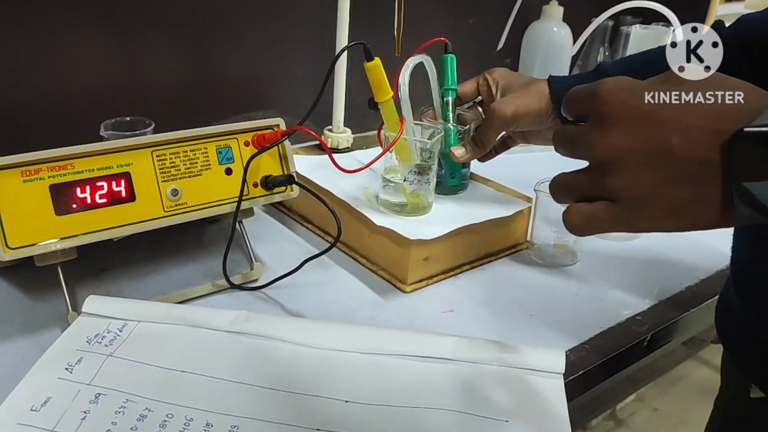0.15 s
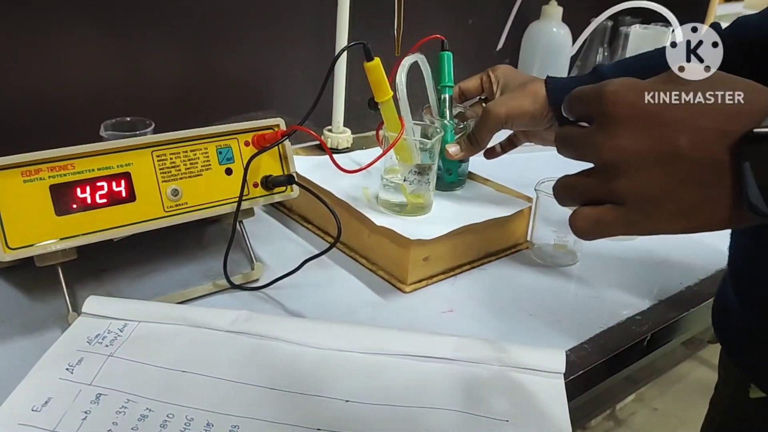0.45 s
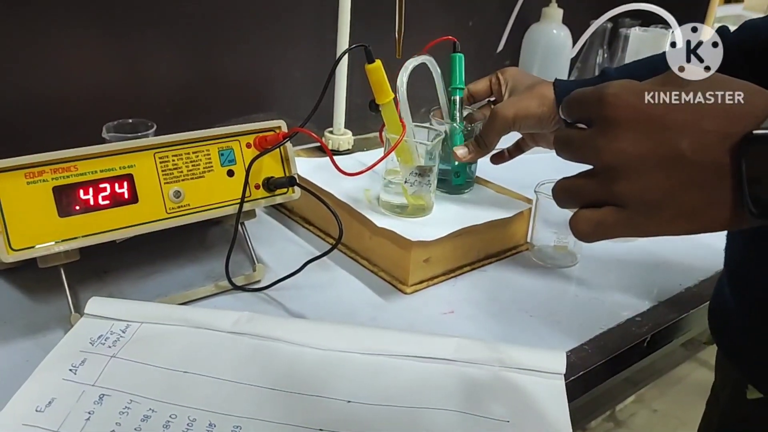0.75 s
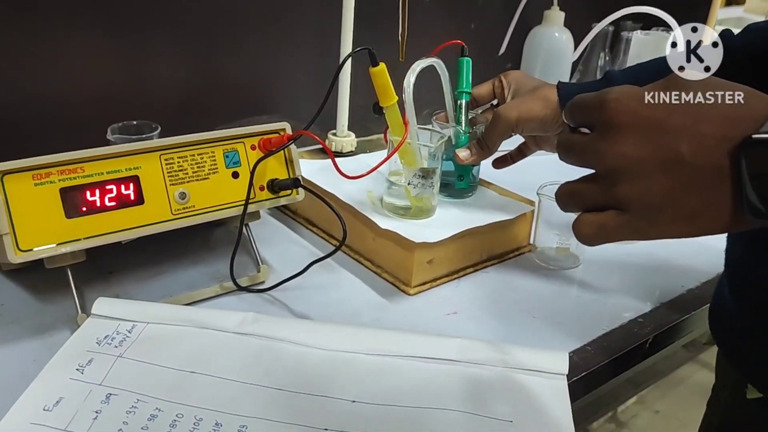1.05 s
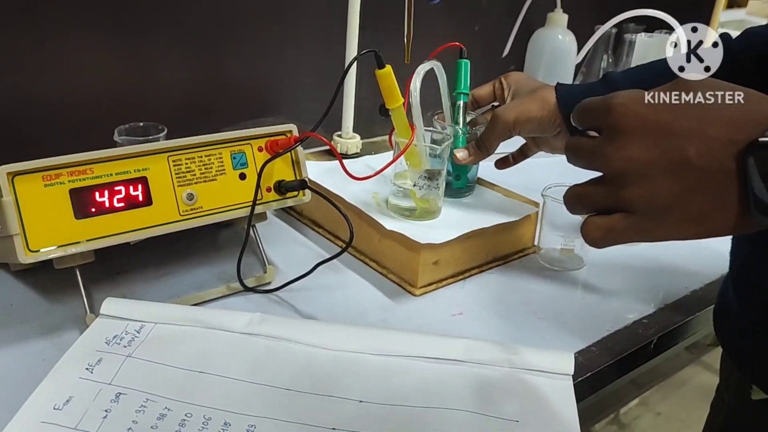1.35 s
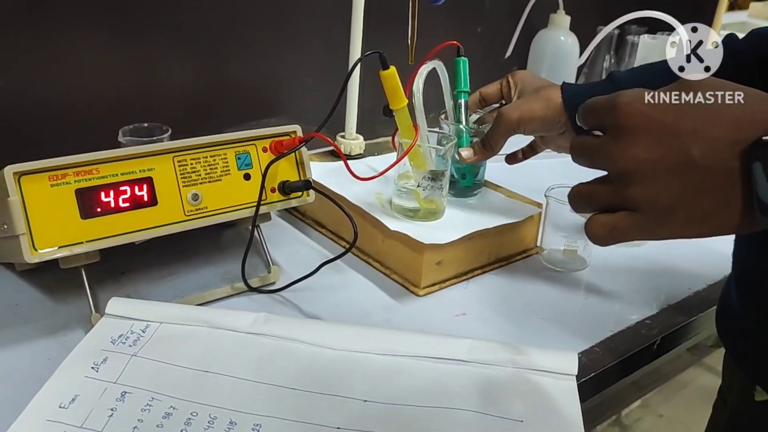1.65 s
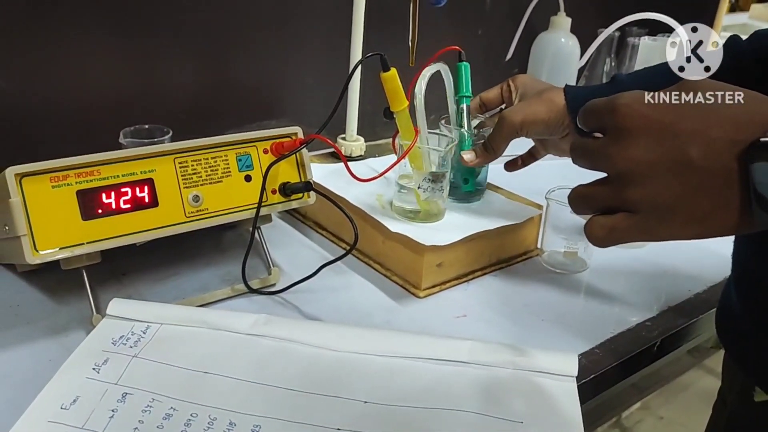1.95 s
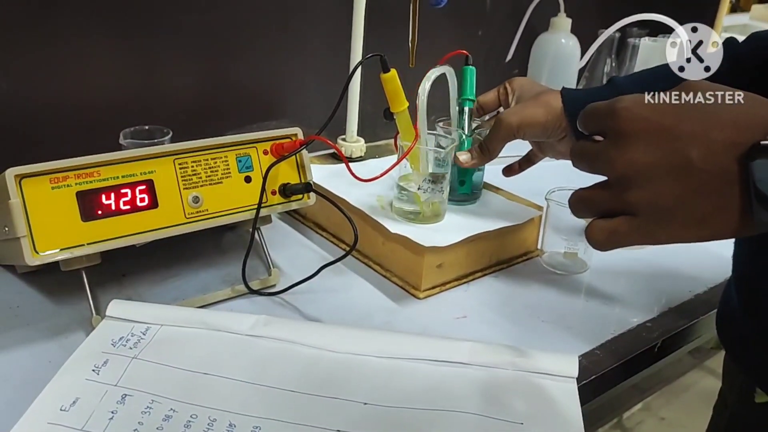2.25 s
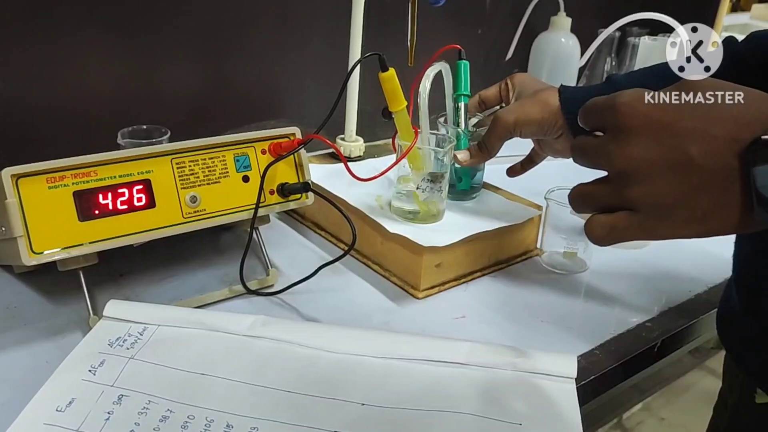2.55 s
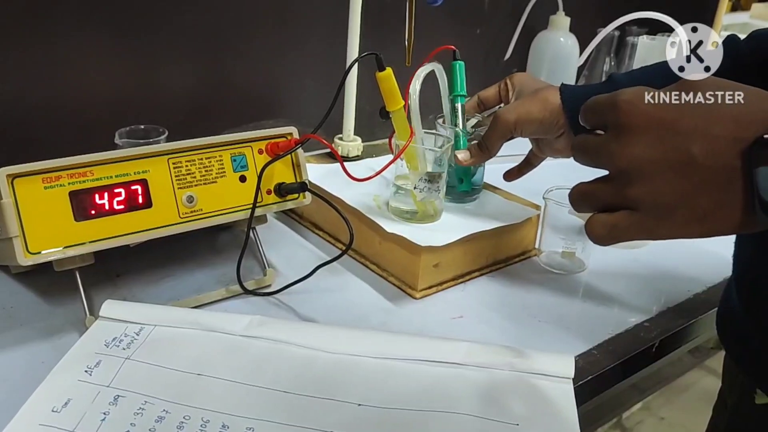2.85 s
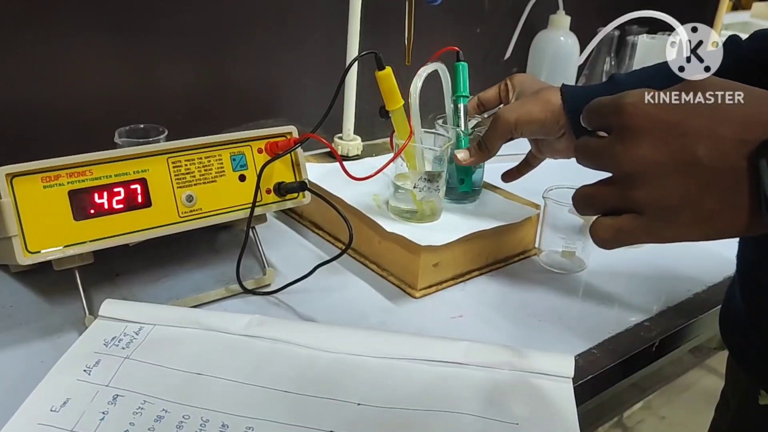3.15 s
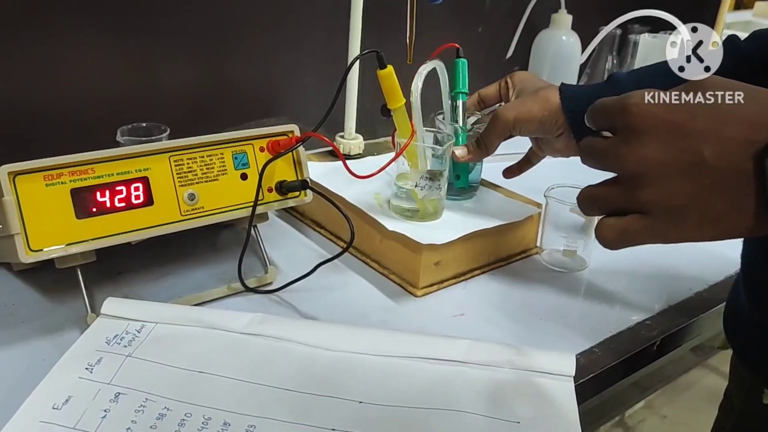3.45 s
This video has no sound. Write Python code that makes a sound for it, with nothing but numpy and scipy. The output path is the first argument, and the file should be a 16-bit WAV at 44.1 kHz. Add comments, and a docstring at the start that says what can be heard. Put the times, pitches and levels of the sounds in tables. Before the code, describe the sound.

A glass beaker swirled by hand, with rapid light clinks and dull knocks on wood.

```python
"""A glass beaker is swirled by hand on a wooden block in a small hard room, over faint room noise.
From the start, about four times a second, its foot knocks dully on the block, a glass tube clinks on
one side and an electrode (a probe in the beaker) rattles against the other. Around two seconds in,
the rim rings softly, mostly as the foot knocks. Then the electrode twice strikes the rim squarely, so
the whole beaker rings. The clinks, taps and knocks go on to the end."""
import sys
import numpy as np
from scipy import signal
from scipy.fft import rfft, irfft
from scipy.io import wavfile

SR = 44100
rng = np.random.default_rng(int(sys.argv[2]) if len(sys.argv) > 2 else 0)


def waveform_to_disk(signal):
    """Save audio, clipped to [-1, 1], as 16-bit WAV at the path in sys.argv[1]."""
    frames = np.transpose(np.atleast_2d(signal))
    scaled = np.clip(frames, -1, 1) * 32767
    samples = np.round(scaled).astype(np.int16)
    wavfile.write(sys.argv[1], SR, samples)


N = 158760

# Levels in the tables are relative. A mode is one tone of a struck object; its fade is the time it
# takes to drop 60 dB. Pan is left minus right. A crack is the short hiss of a contact.
# room noise (frequency [Hz], level [dB])
AIR_SPECTRUM = [(25, 5), (50, 0.5), (80, 6.5), (135, 10.5), (200, 9), (290, 8), (430, 6), (650, -4),
                (1050, -10), (1800, -6.5), (2800, -9.5), (5000, -13.5), (8500, -9), (10500, -22),
                (14000, -26.5)]
# how long the room rings (frequency [Hz], fade [s])
ROOM_FADES = [(200, 1), (1500, 0.67), (5000, 0.72), (9000, 0.57), (15000, 0.35)]
# how much of the left-right difference is kept (frequency [Hz], gain [dB])
STEREO_WIDTH = [(25, -5), (60, -2), (130, -13.5), (300, -13), (480, -6.5), (750, -2), (1500, 0)]
# knocks of the foot (time [s], thud [dB], clack [dB], glass tick [dB])
FOOT_KNOCKS = [(.004, -39, -64, -55), (.133, -35.5, -41.5, -30.5), (0.259, -38, -40, -22),
               (0.342, -37.5, -44, -37.5), (.582, -32, -39, -27.5), (0.823, -55, -44, -29),
               (.831, -34.5, -40, -44), (1.046, -38, -40.5, -35.5), (1.262, -34.5, -39, -29.5),
               (1.461, -36.5, -41, -34), (1.704, -32.5, -37, -29.5), (1.856, -36.5, -39.5, -27.5),
               (1.942, -30.5, -36, -34), (1.956, -42, -47, -29), (2.084, -35.5, -50, -26),
               (2.113, -42, -42, -30), (2.166, -34, -38, -29.5), (2.364, -44.5, -42, -46),
               (2.738, -44, -45, -32), (2.804, -38, -40.5, -27.5), (2.967, -45, -42.5, -38),
               (3.041, -38, -38.5, -28.5), (3.21, -42, -39.5, -26), (3.469, -40.5, -48, -33.5)]
# hollow tocks as the foot settles (time [s], level [dB], glass tick [dB])
FOOT_TOCKS = [(0.168, -48.5, -44), (0.602, -46.5, -51), (0.64, -47.5, -52), (0.849, -52, -63),
              (1.065, -49.5, -46), (1.894, -47.5, -53), (1.993, -40, -37.5), (3.212, -46.5, -38)]
# deeper bumps of the block on the bench (time [s], level [dB])
BENCH_BUMPS = [(.282, -34), (1.866, -41.5), (1.956, -36.5), (2.169, -44)]
# the rim rings softly, mostly as the foot knocks on the block (time [s], level [dB], pitch [Hz])
RIM_RINGS = [(1.676, -23, 5930), (1.704, -20, 6040), (1.941, -18.5, 5960), (2.09, -15, 5880)]
# tube clinks (time [s], level [dB], pitch [Hz], rim ring [dB], crack [dB])
TUBE_CLINKS = [(0.029, -29.5, 5040, 2, 6.5), (0.387, -19, 4680, -20, -4.5), (0.632, -21.5, 4900, -30, -0.5),
               (0.856, -18.5, 4920, -10, -10), (1.137, -29.5, 5000, -25, 3), (1.377, -19, 4970, -16, -24),
               (1.614, -16.5, 4900, -20, -6.5), (1.8409, -10.5, 4836, -10, -7),
               (2.063, -12.5, 4800, -16, -3), (2.293, -14, 4770, -20, -1), (2.3219, -18, 5100, -8, -2.5),
               (2.7326, -14, 4930, -2, -4.5), (2.963, -13, 4900, 1, -5), (3.194, -17, 4905, 4, 1),
               (3.4107, -17.5, 4915, 6.5, 3)]
# electrode taps (time [s], level [dB], pitch [Hz], stretch of the other modes [ratio], rim ring [dB],
# crack [dB], boost of the highest modes [dB])
ELECTRODE_TAPS = [(0.243, -16, 4780, 0.99, -10, -8, 3.5), (0.2591, -21, 4560, 1.02, -4, 7, 1.5),
                  (0.4735, -20.5, 4950, 0.97, -7, 0, -1), (0.7102, -15, 5170, 0.99, -9, -3, -0.5),
                  (.928, -23.5, 4960, 0.95, -0.5, 2, -2.5), (1.192, -15, 5110, 1.02, -8, 3.5, 1),
                  (1.398, -18.5, 5160, 0.97, -3, -1, 3), (1.654, -14, 5000, 0.99, -2, 2, 0),
                  (1.886, -13, 5140, 1.03, -3.5, 3, 1.5), (2.081, -18, 4650, 1.08, 8, 5.5, 1),
                  (2.109, -11.5, 4680, .995, 0, -2, -4), (2.790, -17, 5100, 1, 2, -3, -6),
                  (3.029, -15, 5110, 0.98, 0, -5.5, -3.5), (3.241, -21.5, 4560, 1, 5, 1.5, -3),
                  (3.463, -28, 5090, 1.01, 5.5, 6, -5), (3.475, -28.5, 4900, 1.06, 5, 8, -2)]
# square strikes on the rim (time [s], level [dB], wall mode [Hz], wall mode [dB], low mode [dB])
RIM_STRIKES = [(2.3305, -14, 4700, -1.5, -17), (2.5676, -20, 4850, -6, -9)]
# modes of the foot, block and bench (frequency [Hz], level [dB], fade [s], pan [dB])
THUD_MODES = [(196, -9.5, 0.052, 0.029), (288.3, -3.5, 0.11, 0.82), (334.3, -0.5, 0.056, -2.4),
              (427.3, -6, 0.082, -1)]
CLACK_MODES = [(880, -5.5, 0.014, -2), (1345, -1, 0.04, 10.5), (1607, 0, 0.025, 7), (1946, -2, 0.053, 0),
               (2425, -3, 0.014, 2)]
TICK_MODES = [(4155, 1, 0.011, -9), (4680, 0, 0.0073, -9), (6900, -5, 0.007, -15), (8690, -1.5, 0.026, -2),
              (11900, -12, 0.0078, -3), (14330, -9, 0.0092, -9)]
TOCK_MODES = [(1863, 1.5, 0.021, 2), (1957, 4.5, 0.047, -1.5)]
TOCK_TICK_MODES = [(5000, 1, 0.0091, -18)]
BENCH_MODES = [(137.4, -2, 0.083, -5.5), (199, -3, 0.18, -20.5), (275, -0.5, 0.12, 1)]
# modes of the glass (frequency [Hz], level [dB], fade [s], pan [dB])
TUBE_MODES = [(1828, -17, 0.063, 0.5), (4090, -22, 0.024, -3), (4860, 1, 0.018, -15),
              (8270, -5, 0.047, -6.5), (9110, -7, 0.043, -3), (10900, -15, 0.0063, -12),
              (13900, -15, .006, -14), (15700, -22, 0.018, 15)]
BEAKER_WALL_MODES = [(3843, -12.5, 0.053, -4), (4810, -10, 0.047, -13), (4970, -3, 0.011, -9.5),
                     (7080, -16.5, 0.035, 2), (8170, -12, 0.025, -21), (8708, -2.5, 0.025, -5.5),
                     (8330, -19.5, 0.0084, 23), (11275, -9.5, 0.017, -4.5), (13870, -14, 0.022, -20),
                     (13370, -13.5, 0.036, -8)]
RIM_MODES = [(5906, -18.5, 0.27, -16), (5964, -13.5, 0.14, -11), (9870, -32, 0.05, -5)]
WHOLE_BEAKER_MODES = [(5930, -4, .07, -12), (5942, -17, .16, -4), (6380, -16, .025, -5),
                      (6850, -15, .025, -3), (7270, -14, .025, -3), (8550, -7, .016, -3),
                      (9120, -12, .018, -3), (9960, -14, .05, -5), (11200, -13, .008, -6),
                      (13500, -10, .013, -11), (15200, -22, .03, -5)]
# cracks of glass on wood, of the tube and of the electrode (frequency [Hz], level [dB])
FOOT_CRACK_SPECTRUM = [(200, -28), (780, -11), (1050, -9), (1400, -5), (2500, -0.5), (4200, -3.5),
                       (6000, -0.5), (9000, -4.5), (10500, -50), (15000, -18)]
TUBE_CRACK_SPECTRUM = [(200, -15), (900, -3.5), (1500, -7), (2600, -10), (4000, 5), (6500, -3), (9500, 3.5),
                       (10500, -8), (14000, 4), (15500, -12)]
GLASS_CRACK_SPECTRUM = [(200, -23), (900, -30), (1500, 1.5), (2800, -13), (3700, -2), (6500, -3.5),
                        (9000, 9.5), (10400, -49), (12500, -15.5), (15000, -23)]

RING_TIME = np.arange(SR // 3) / SR  # seconds since a contact
AIR_DB, THUD_DB, CLACK_DB, TICK_DB, TUBE_DB, TAP_DB = -49.5, -1, -3.5, -8, -8.5, -6
BOUNCE_S, BOUNCE_WIDTH_S, BOUNCE_GAIN = 0.0035, 0.00042, 0.85
FIRST_TOUCH, SCATTER, RIGHT_LAG_S = 3.57, 0.53, 0.000185
WAVER_DEPTH, WAVER_HZ, RISE_CYCLES = 0.0023, 28.3, 0.83  # depth is a share of the pitch
ECHO_START_S, ECHO_DECAY_S = 0.0066, 0.012
WALL_ECHO_S, WALL_ECHO_WIDTH_S, WALL_ECHO_GAIN = 0.01356, 0.00095, 0.74
FOOT_CHATTER_S, THUD_LAG_S = 0.002, 0.002865
RATTLE_GAP_S, RATTLE_DB, RATTLE_FALL_DB_PER_S = 0.015, -9, 211
SPARKLE_ABOVE_HZ, TOP_HZ = 10500, 15500


def gain(db):
    """Turn decibels into a number to multiply by."""
    return 10 ** (np.asarray(db) / 20)


def normalise(x):
    """Scale each channel to the energy of a five-millisecond burst at full level."""
    return x / np.sqrt(np.sum(x ** 2, axis=-1, keepdims=True) / (.005 * SR))


def pan(db):
    """Share a sound between left and right, keeping its total power."""
    sides = gain(np.array([[db], [-db]]) / 2)
    return sides / np.sqrt(np.mean(sides ** 2))


def colour(x, spectrum):
    """Turn each frequency up or down along a curve of (frequency [Hz], level [dB]) points."""
    n = x.shape[-1]
    hz, db = np.array(spectrum).T
    curve_db = np.interp(np.log(np.fft.rfftfreq(n, 1 / SR) + 1), np.log(hz), db)
    return irfft(rfft(x) * gain(curve_db), n)


def add(out, time, x):
    """Mix a sound in at a time in seconds."""
    start = max(int(time * SR), 0)
    out[:, start:start + x.shape[1]] += x[:, :N - start]


def contact(chatter_s):
    """The push of a hit: a first touch, then brief chatter with a bounce, a bit different each side."""
    t = RING_TIME[:SR // 50]
    noise = rng.standard_normal((3, len(t)))
    chatter = np.exp(-(t / chatter_s) ** 4)
    bounce = BOUNCE_GAIN * np.exp(-((t - BOUNCE_S) / BOUNCE_WIDTH_S) ** 2)
    push = (noise[0] + SCATTER * noise[1:]) * (chatter + bounce)
    push[:, 0] += FIRST_TOUCH
    return push


def ring(modes, pitch=1, chatter_s=0.005):
    """One hit sets the modes ringing, wavering a little; the sound reaches the right side later."""
    push, out = contact(chatter_s), 0
    t = np.maximum(RING_TIME - np.array([[0], [RIGHT_LAG_S]]), 0)
    waver = WAVER_DEPTH / (2 * np.pi * WAVER_HZ) * np.sin(2 * np.pi * (WAVER_HZ * t + rng.random()))
    for hz, db, fade_s, pan_db in modes:
        envelope = (1 - np.exp(-t * hz / RISE_CYCLES)) * np.exp(-np.log(1000) * t / fade_s)
        tone = np.sin(2 * np.pi * hz * pitch * (t + waver)) * envelope
        struck = signal.fftconvolve(tone, push, axes=1)[:, :len(RING_TIME)]
        out = out + normalise(struck) * pan(pan_db) * gain(db)
    return out


def retune(modes, hz, stretch=1):
    """The point of contact moves the mode nearest to hz onto it; the others stretch together."""
    nearest = min(modes, key=lambda mode: abs(mode[0] - hz))
    return [(hz if mode is nearest else mode[0] * stretch, *mode[1:]) for mode in modes]


def crack(spectrum, decay_s, pan_db):
    """A contact makes a burst of noise that dies quickly."""
    noise = colour(rng.standard_normal((2, len(RING_TIME))), spectrum)
    return normalise(noise * np.exp(-RING_TIME / decay_s)) * pan(pan_db)


def air():
    """Faint, steady room noise, mostly low in pitch."""
    noise = colour(rng.standard_normal((2, N)), AIR_SPECTRUM)
    return noise * gain(AIR_DB) / np.std(noise)


def room(x, tail_db):
    """The room adds a smooth tail of echoes whose highest tones die first."""
    t = np.arange(SR) / SR
    noise, hz = rfft(rng.standard_normal((2, SR))), np.fft.rfftfreq(SR, 1 / SR)
    centres, tail = np.array(ROOM_FADES)[:, 0], 0
    for share, (_, fade_s) in zip(np.eye(len(centres)), ROOM_FADES):
        band = irfft(noise * np.interp(hz, centres, share), SR)
        tail = tail + band * (t > WALL_ECHO_S) * np.exp(-np.log(1000) * t / fade_s)
    tail /= np.sqrt(np.sum(tail ** 2) / 2)
    return x + gain(tail_db) * signal.fftconvolve(x, tail, axes=1)[:, :N]


def echoes(x, db):
    """Quick echoes off the bench and a wall, new for each hit because the beaker moves."""
    t = RING_TIME[:SR // 12]
    bench = (t > ECHO_START_S) * np.exp(-(t - ECHO_START_S) / ECHO_DECAY_S)
    wall = WALL_ECHO_GAIN * np.exp(-((t - WALL_ECHO_S) / WALL_ECHO_WIDTH_S) ** 2)
    envelope = bench + wall
    pattern = rng.standard_normal((2, len(t))) * envelope / np.sqrt(np.sum(envelope ** 2))
    return x + gain(db) * signal.fftconvolve(x, pattern, axes=1)[:, :x.shape[1]]


def beaker_foot():
    """The rocking foot clacks, ticks and thuds, and settles with a tock; the block bumps the bench."""
    out = np.zeros((2, N))
    for time, thud_db, clack_db, tick_db in FOOT_KNOCKS:
        tick = ring(TICK_MODES) + gain(-5.5) * crack(FOOT_CRACK_SPECTRUM, decay_s=.004, pan_db=1.5)
        clack = gain(clack_db + CLACK_DB) * ring(CLACK_MODES, chatter_s=FOOT_CHATTER_S)
        add(out, time, echoes(clack + gain(tick_db + TICK_DB) * tick, db=-4))
        thud = gain(thud_db + THUD_DB) * ring(THUD_MODES, chatter_s=FOOT_CHATTER_S)
        add(out, time + THUD_LAG_S, echoes(thud, db=-5.5))
    for time, db, tick_db in FOOT_TOCKS:
        tock = gain(db) * ring(TOCK_MODES) + gain(tick_db) * ring(TOCK_TICK_MODES)
        add(out, time, echoes(tock, db=-1))
    for time, db in BENCH_BUMPS:
        add(out, time, gain(db) * ring(BENCH_MODES))
    return out


def rim_rings():
    """The rim rings softly, mostly as the foot knocks on the block."""
    out = np.zeros((2, N))
    for time, db, hz in RIM_RINGS:
        rim = ring(RIM_MODES, pitch=hz / RIM_MODES[0][0])
        add(out, time, gain(db) * echoes(rim, db=-2))
    return out


def glass_tube():
    """The tube clinks on the beaker; its main tone shifts with the point of contact."""
    out = np.zeros((2, N))
    for time, db, hz, rim_db, crack_db in TUBE_CLINKS:
        clink = ring(retune(TUBE_MODES, hz)) + gain(rim_db) * ring(RIM_MODES)
        clink += gain(crack_db - 3.5) * crack(TUBE_CRACK_SPECTRUM, decay_s=.0085, pan_db=-2)
        add(out, time, gain(db + TUBE_DB) * echoes(clink, db=-8.5))
    return out


def glass_crack():
    """The sharp noise of glass meeting glass."""
    return gain(-7.5) * crack(GLASS_CRACK_SPECTRUM, decay_s=.007, pan_db=-2)


def add_rattle(out, time, db):
    """After a hit the electrode rattles on: six unevenly spaced cracks, ever fainter."""
    for delay in RATTLE_GAP_S * np.cumsum(rng.uniform(.5, 1.5, size=6)):
        add(out, time + delay, gain(db + RATTLE_DB - RATTLE_FALL_DB_PER_S * delay) * glass_crack())


def electrode():
    """Bright, rough taps ring the beaker's wall and rattle on briefly."""
    out = np.zeros((2, N))
    for time, db, hz, stretch, rim_db, crack_db, sparkle_db in ELECTRODE_TAPS:
        modes = [(mode_hz, level + sparkle_db * (mode_hz > SPARKLE_ABOVE_HZ), fade_s, pan_db)
                 for mode_hz, level, fade_s, pan_db in retune(BEAKER_WALL_MODES, hz, stretch)]
        tap = ring(modes) + gain(rim_db) * ring(RIM_MODES) + gain(crack_db) * glass_crack()
        add(out, time, gain(db + TAP_DB) * echoes(tap, db=-3.5))
        add_rattle(out, time, db)
    return out


def rim_strikes():
    """The electrode hits the rim squarely, so the whole beaker rings."""
    out = np.zeros((2, N))
    for time, db, wall_hz, wall_db, low_db in RIM_STRIKES:
        # two more modes (frequency [Hz], level [dB], fade [s], pan [dB])
        wall_mode, low_mode = (wall_hz, wall_db, .022, -10), (3530, low_db, .03, -2)
        strike = ring(WHOLE_BEAKER_MODES + [wall_mode, low_mode]) + gain(-2) * glass_crack()
        add(out, time, gain(db) * echoes(strike, db=-5.5))
        add_rattle(out, time, db + 3.5)
    return out


def scene():
    """All the clinks, taps and knocks echo in the room, over its noise."""
    return (room(glass_tube(), tail_db=-14)
            + room(electrode() + rim_rings(), tail_db=-15.5)
            + room(rim_strikes(), tail_db=-14.5)
            + room(beaker_foot(), tail_db=-10)
            + air())


def record(dry):
    """Two microphones close together hear the bass much alike; the very highest tones are cut."""
    middle = (dry[0] + dry[1]) / 2
    side = colour((dry[0] - dry[1]) / 2, STEREO_WIDTH)
    low_pass = signal.ellip(8, .2, 70, TOP_HZ, fs=SR, output="sos")
    return signal.sosfilt(low_pass, np.array([middle + side, middle - side]))


dry = scene()
out = record(dry)
waveform_to_disk(out)
```